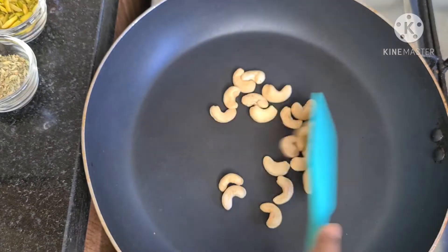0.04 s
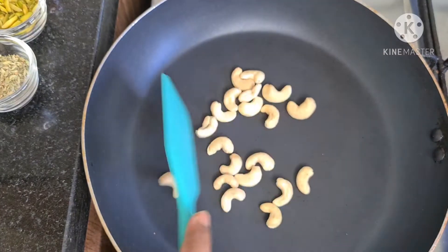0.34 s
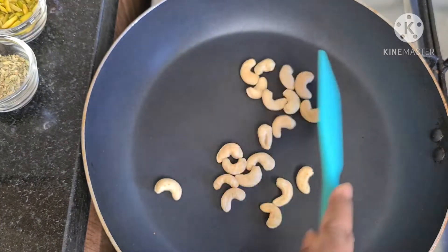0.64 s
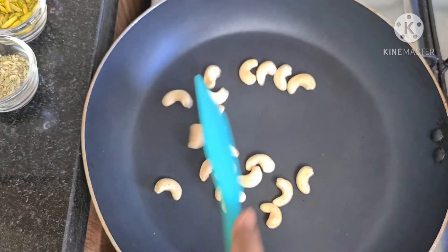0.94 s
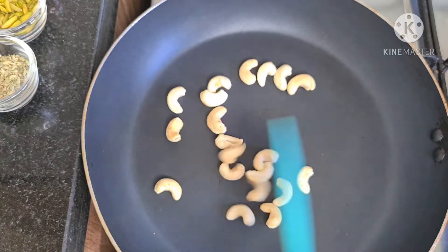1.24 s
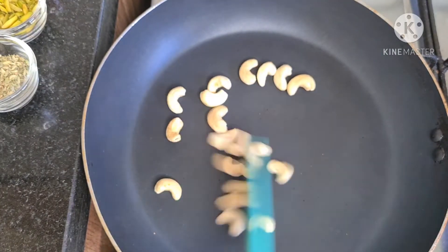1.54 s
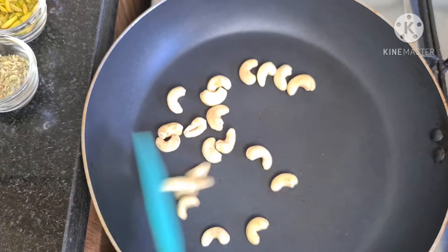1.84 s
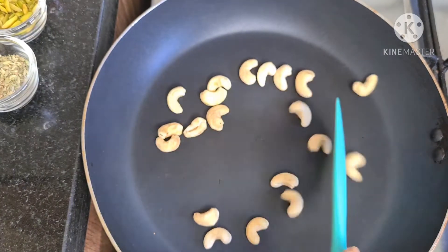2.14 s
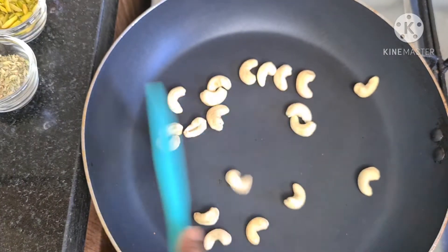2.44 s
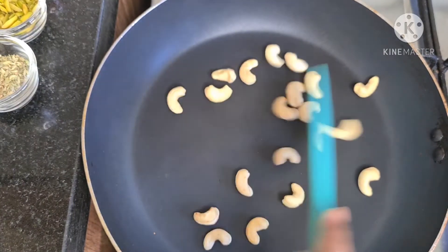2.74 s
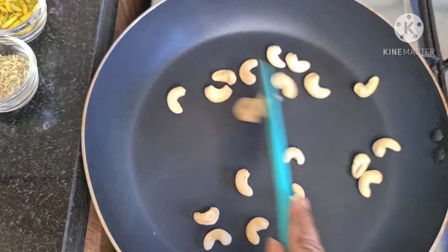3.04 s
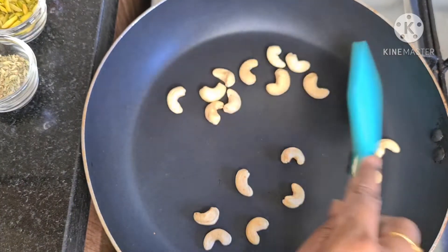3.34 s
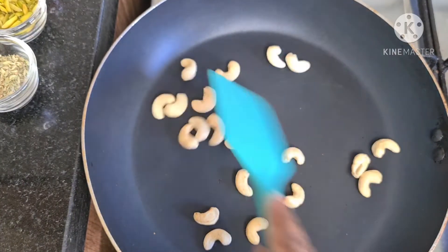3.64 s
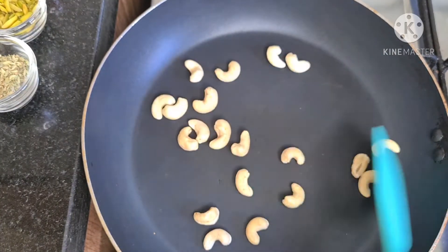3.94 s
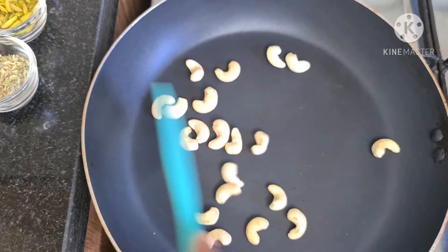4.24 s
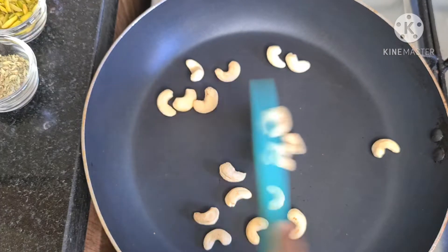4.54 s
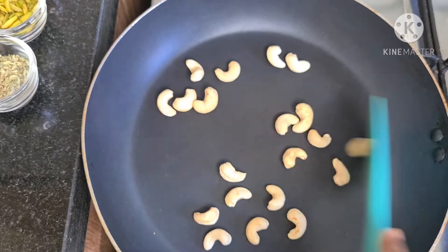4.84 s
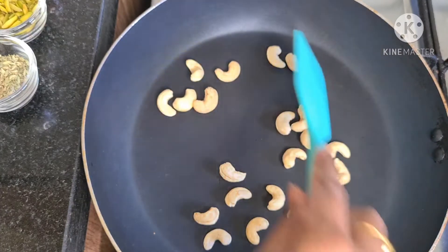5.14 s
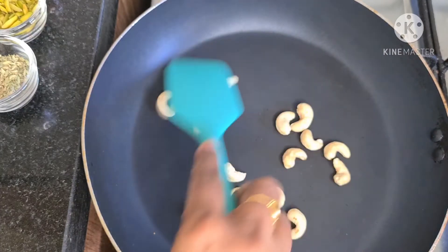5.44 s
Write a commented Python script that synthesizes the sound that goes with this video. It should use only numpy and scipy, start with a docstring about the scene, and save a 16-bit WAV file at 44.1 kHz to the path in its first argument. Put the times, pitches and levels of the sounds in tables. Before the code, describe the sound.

Cashews are stirred around a dry frying pan with a silicone spatula. Short, uneven strokes drag them across the coating in rattling scrapes, and single nuts knock against the pan with a dull, brief ring. Thin metal bangles clink high above now and then. The stirring eases briefly near the end, then resumes. The microphone is close, in a small kitchen with a faint rumble and hiss.

```python
"""Cashews rattle and scrape around a dry frying pan, stirred with a silicone spatula close to a phone.
Each stroke drags the nuts over the coating in a stream of tiny bumps, and single knocks ring the same
damped pan. Thin metal, probably bangles on the stirring wrist, clinks high above them.
The walls of a small kitchen add a short tail; a low rumble, a weak hum and a faint hiss lie underneath."""
import sys
import numpy as np
from scipy import signal
from scipy.fft import rfft, irfft
from scipy.io import wavfile

SR = 44100
rng = np.random.default_rng(int(sys.argv[2]) if len(sys.argv) > 2 else 0)


def master(y):
    """Save y as 16-bit WAV."""
    cut = np.clip(np.atleast_2d(y).T, -1, 1)
    pcm = np.round(cut * 32767)  # scale
    wavfile.write(sys.argv[1], SR, pcm.astype(np.int16))


N = 251281
RING_SIZE, STROKE_SIZE, ONSET_SIZE = 10000, 30000, 900  # samples
TIME = np.arange(N) / SR
AGE = TIME[:RING_SIZE]  # seconds since a hit

# resonances of the pan: (frequency [Hz], level [dB], t60 [s])
PAN_MODES = [(653.3, -34, 0.42), (665.4, -9.5, 0.13), (804, 3.5, 0.15), (823.3, -1.5, 0.057),
             (807.8, 7.5, 0.15), (835, 7.5, 0.018), (981, -1, 0.12), (1030, -8.5, 0.05),
             (1209, -14.5, 0.045), (1297.6, -5, 0.088), (1407, -17, 0.24), (1525, -3, 0.036),
             (1857, -1.5, 0.024), (1940, -21, 0.096), (2008, -13.5, 0.12), (2090, -31, 0.1),
             (2360, -29.5, 0.24), (2646, -24.5, 0.39), (2800, -12.5, 0.086), (2857, -26.5, 0.17),
             (3185, -16.5, 0.073), (3335, -21, 0.087), (3580, -22.5, 0.13), (3570, -35.5, 0.12),
             (4097, -29.5, 0.15), (4080, -27, 0.14), (4580, -23.5, 0.1)]


def amp(db):
    """Decibels to gain."""
    return 10 ** (np.asarray(db) / 20)


def fade(t60):
    """Exponential decay over the length of one ring."""
    return np.exp(-np.log(1000) * AGE / t60)


def unit(x, size=N):
    """Scale to rms 1 over the first `size` samples."""
    return x / np.sqrt(np.mean(x[..., :size] ** 2))


def band(x, low_hz, high_hz):
    """Causal band-pass."""
    return signal.sosfilt(signal.butter(2, [low_hz, high_hz], "band", fs=SR, output="sos"), x)


def noise(colour, size, alike_hz):
    """Stereo noise coloured by (frequency [Hz], level [dB]) points, narrowing to mono below alike_hz."""
    hz, db = np.transpose(colour)
    bin_hz = np.fft.rfftfreq(size, 1 / SR) + 1
    mid, side = rfft(rng.standard_normal((2, size)))
    side = side * bin_hz / np.hypot(bin_hz, alike_hz)
    gain = amp(np.interp(np.log(bin_hz), np.log(hz), db))
    return unit(irfft(np.array([mid + side, mid - side]) * gain, size))


def add(out, time_s, sound):
    """Mix a sound in at time_s."""
    i = max(int(time_s * SR), 0)
    out[:, i:i + sound.shape[1]] += sound[:, :max(N - i, 0)]


def ringing(modes, rise_cycles):
    """One decaying complex tone for each mode; the contact time rounds its start."""
    hz, db, t60 = np.transpose(modes)
    poles = np.exp((2j * np.pi * hz - np.log(1000) / t60) / SR)
    tones = np.cumprod(np.repeat(poles[:, None], RING_SIZE, axis=1), axis=1)
    rise = np.minimum(np.outer(hz, AGE) / rise_cycles, 1)
    return amp(db)[:, None] * rise * tones


def mode_shares(hz, wide_hz, spread_db=3.5):
    """The struck spot sets each mode's share; higher modes reach the two microphones out of step."""
    share, turn = rng.standard_normal((2, len(hz)))
    phase = np.minimum((hz / wide_hz) ** 2, 1) * turn
    return amp(spread_db * share) * np.exp(1j * np.array([phase, -phase]))


def pan_contact(tones):
    """A nut touches one spot of the pan: ringing modes plus a dry crack, in five equally loud registers."""
    # the registers belly, wall, clack, bite and tick: (low edge [Hz], high edge [Hz])
    registers = [(600, 720), (720, 1000), (1000, 1650), (1650, 2600), (2600, 11000)]
    # dry crack of nut on metal: (frequency [Hz], level [dB])
    crack_colour = [(450, -41), (640, 6), (880, 5), (1150, 6.5), (1500, 15), (2000, -29.5), (2500, -7.5),
                    (3300, -5), (5000, -12.5), (7500, -20), (11000, -25), (16000, -52)]
    hz = np.array(PAN_MODES)[:, 0]
    share = mode_shares(hz, wide_hz=1417)
    damping = 1 + 0.52 * fade(0.42)  # the ring falls faster at first, while the nut presses on the metal
    crack = amp(-7) * noise(crack_colour, RING_SIZE, alike_hz=1810) * (fade(0.056) + 2.04 * fade(0.11))
    parts = []
    for low, high in registers:
        inside = (hz >= low) & (hz < high)
        ring = damping * ((share * inside) @ tones).imag
        parts.append(unit(ring + band(crack, low, high), ONSET_SIZE))
    return np.array(parts)


def register_gains(level_db, belly_db, clack_db, tick_db, trim_db):
    """The spot splits the ring between belly and wall; a hard touch adds clack, bite and tick."""
    wall = level_db - 10 * np.log10(1 + amp(belly_db) ** 2)
    levels_db = np.array([wall + belly_db, wall, level_db + clack_db, level_db + tick_db])
    belly, wall, clack, tick = levels_db + trim_db
    bite = clack + 0.47 * (tick - clack) + 1
    return amp([belly, wall, clack, bite, tick])


def spatula_push(length_s, crescendo_db, attack_s=0.0082, settle_db_per_s=410, rock_db_per_s=78):
    """The blade gathers or sheds nuts until its release; then most stop quickly and a few rock on."""
    t = TIME[:STROKE_SIZE]
    attack = np.minimum(t / attack_s, 1)
    to_go = np.clip(1 - t / max(length_s, attack_s), 0, 1)
    after_s = np.maximum(t - length_s, 0)
    settling = amp(-settle_db_per_s * after_s)
    rocking = amp(-12.5 - rock_db_per_s * after_s)
    return attack * amp(-crescendo_db * to_go) * np.hypot(settling, rocking)


def sliding_nuts(spots, nuts=4, bumps_per_s=400, spread_db=4):
    """Nuts catch and slip on the coating, each a stream of tiny uneven bumps at its own spot."""
    # spatula strokes: (start [s], release [s], level at release [dB], crescendo [dB],
    # belly over wall [dB], clatter over level [dB], rasp over level [dB])
    strokes = [(0, 0.01, -43, -21.5, 0, 0, -10.5), (0.091, 0.311, -40.5, 6.5, -5, -5.5, -18.5),
               (0.401, 0.45, -38.5, -0.5, 1.5, -7.5, -26.5), (0.538, 0.628, -53, 15, 3, 12.5, -1.5),
               (0.769, 0.928, -37, 8.5, -14, -6, -17), (1.164, 1.217, -43, -3, -8.5, -18, -31),
               (1.253, 1.324, -37.5, -1, -5.5, -1.5, -17.5), (1.484, 1.665, -42.5, 3.5, -4.5, -7.5, -20),
               (1.723, 1.821, -40.5, -6, -7.5, -4, -22), (1.904, 1.996, -35.5, 6.5, -16, -4, -16.5),
               (2.141, 2.213, -41, -4.5, 1.5, -6, -15.5), (2.274, 2.414, -55, 1, -4, -15, -26),
               (2.516, 2.708, -33, 20.5, -4, -1.5, -17.5), (2.74, 2.845, -41.5, 0.5, 2, -4, -19),
               (2.985, 3.11, -36, 17, -5, -10.5, -25), (3.386, 3.633, -36, 14.5, -9.5, -5, -20.5),
               (4.03, 4.152, -43, 8.5, -6, -7, -20.5), (4.273, 4.32, -46.5, 0, -2, -17, -23),
               (4.42, 4.672, -51.5, -12, -4.5, -7, -18), (4.872, 5.008, -56.5, 4, 13, -9, -13.5),
               (5.25, 5.387, -52.5, 14, 0, 6, -4.5), (5.403, 5.556, -48, -0.5, -24, -5, -14.5),
               (5.572, 5.687, -35, 8.5, -8, -15, -23.5)]
    out = np.zeros((2, N))
    for start, release, level, crescendo, *colour in strokes:
        push = spatula_push(release - start, crescendo)
        rattle = 0
        for k in rng.permutation(len(spots))[:nuts]:
            strength = amp(spread_db * np.minimum(rng.exponential(size=STROKE_SIZE), 4))
            direction = rng.choice([-1, 1], STROKE_SIZE)
            catches = rng.random(STROKE_SIZE) < bumps_per_s / nuts / SR
            bumps = np.float32(push * strength * direction * catches)
            rattle = rattle + signal.fftconvolve(bumps[None, None], np.float32(spots[k]), axes=-1)
        gains = register_gains(level, *colour, trim_db=[-1, 0.67, -4.15, -1.2])
        effort = np.sqrt(np.mean(push ** 2))
        add(out, start, effort * sum(gain * unit(part) for gain, part in zip(gains, rattle)))
    return out


def knocks(spots, lead_s=0.0009):
    """Single blows on the pan: soft ones near the centre ring the belly, hard ones clack and tick."""
    # knocks of nuts and spatula:
    # (time [s], level [dB], belly over wall [dB], clack over level [dB], tick over level [dB])
    blows = [(0.124, -40.5, 2, -4.5, -22), (0.155, -32, -25, -18, -38), (0.206, -40, -23, -28, -36),
             (0.259, -26.5, -15, -5.5, -22.5), (0.295, -28, -19, -9.5, -38), (0.343, -43, -17, 9.5, -9.5),
             (0.379, -38.5, -17, -20, -26), (0.434, -34, -14, -11, -27), (0.497, -38.5, 22, -21, -32),
             (0.541, -25, 6.5, -1.5, -24.5), (0.555, -36, 8, -13, -32), (0.603, -40, 23, 3.5, -10),
             (0.69, -48.5, 3, 4.5, -10.5), (0.738, -46, 20, -29, -38), (0.779, -41, 27, -15, -30),
             (0.864, -35.5, -24, -26, -28), (0.89, -38, -10, -3.5, -14), (0.921, -32, -10, -11, -14),
             (0.949, -31.5, -19, -22, -22), (1.061, -38.5, -23, -2.5, -17), (1.169, -38, -17, -16.5, -31),
             (1.265, -29, -15, -6, -21), (1.288, -38, -20, 4, -11), (1.3, -31, -10, -6, -20),
             (1.526, -36, -12, -8, -24.5), (1.559, -28, -22, -22, -34), (1.626, -33.5, -15, -14, -20),
             (1.645, -30.5, -10, -22, -46), (1.714, -34.5, -13, -9, -30), (1.757, -37, -1, -14, -17),
             (1.947, -34, -18, -6.5, -24), (1.959, -31, -23, -5, -18), (2.01, -38.5, 7, -20, -25),
             (2.152, -37, -1, -11, -8), (2.182, -32, 10, -7.5, -16.5), (2.359, -43.5, -8, -21, -39),
             (2.537, -42, -29, -10, -33), (2.606, -32.5, -35, -28, -40), (2.674, -34.5, -25, 1, -15.5),
             (2.693, -33.5, 26, -19, -18.5), (2.796, -36, 5, 2, -11.5), (2.825, -54, 15, -12, -13),
             (2.981, -42.5, 6, -16, -31), (3.091, -33.5, -12, -9, -36), (3.105, -30, -13, -10, -28),
             (3.138, -30.5, -9, -5, -20.5), (3.403, -43, 26, -16, -13), (3.445, -30, 29, -16.5, -36),
             (3.516, -36, -14, -15, -23), (3.549, -33, -3, -23, -33), (3.609, -30, -5, -11, -15),
             (3.633, -29.5, -5.5, -12, -26), (4.086, -32.5, 2, -12.5, -27.5),
             (4.141, -36.5, -25, -5.5, -7.5), (4.181, -35.5, -25, -11, -25), (4.244, -37, -15, -15.5, -32),
             (4.287, -33.5, -20, -4, -13), (4.373, -37, -20, -2.5, -25.5), (4.456, -35.5, -4, -29, -20),
             (4.529, -30.5, -33, -10.5, -34), (4.588, -35.5, 4, -2, -17), (4.628, -36.5, 10, -3, -24),
             (4.667, -35, 26, -5, -26), (4.735, -48.5, 6, -3.5, -20), (5.113, -52.5, 31, -6, -28),
             (5.464, -38, -16, -1.5, -20.5), (5.614, -37, -22, -15, -38), (5.676, -38, 6, -16, -14.5)]
    out = np.zeros((2, N))
    for k, (time_s, *blow) in enumerate(blows):
        gains = register_gains(*blow, trim_db=[-2.14, -1.5, -1, -1])
        add(out, time_s - lead_s, np.tensordot(gains, spots[k % len(spots)], 1))
    return out


def bangles(fine_count=90, fine_t60=0.056, attack_s=0.0008):
    """Thin metal rings clink: a few clear tones over a splash of finer modes and a shivering chink."""
    # bangle clinks: (time [s], ring level [dB], splash level [dB])
    clinks = [(0.186, -68, -47), (0.243, -52.5, -47), (0.637, -53.5, -57.5), (0.883, -74, -46.5),
              (0.95, -53.5, -48.5), (1.063, -60, -57), (1.573, -60, -57.5), (1.733, -67, -68),
              (2.348, -88, -67.5), (2.436, -62, -60), (3.029, -74, -49.5), (3.044, -79, -46.5),
              (3.108, -55, -48), (3.203, -84, -60.5), (3.56, -49, -55), (3.719, -67, -56.5),
              (4.155, -59.5, -57), (4.442, -63, -54.5), (4.538, -76, -50.5), (4.594, -49.5, -44.5),
              (4.897, -80, -48.5), (4.92, -80, -49.5), (4.958, -42.5, -40.5), (5.04, -66, -60)]
    # clear resonances of the bangles: (frequency [Hz], level [dB], t60 [s])
    bangle_modes = [(5000, -3.5, 0.089), (8730, -4.5, 0.23), (8836, 15, 0.077), (9940, -35, .1),
                    (12600, 0, 0.11), (14600, -13, .08), (15370, -14, 0.088)]
    # colour of the metal's dense high modes: (frequency [Hz], level [dB])
    splash_colour = [(2500, -13), (4800, -11), (6300, -13.5), (7100, -6.5), (8000, -13), (9000, 0.5),
                     (9700, 2), (11000, -7), (12200, 1.5), (13200, -4.5), (14500, 5), (16000, -16.5)]
    fine_hz = np.linspace(4000, 15500, fine_count) + rng.uniform(-90, 90, fine_count)
    fine_modes = [(hz, np.interp(hz, *np.transpose(splash_colour)), fine_t60) for hz in fine_hz]
    fine_tones = ringing(fine_modes, rise_cycles=36)
    clear_tones = ringing(bangle_modes, rise_cycles=10)
    chink_shape = np.minimum(AGE / attack_s, 1) * (fade(0.013) + amp(-14) * fade(0.2))
    balance = amp([[0.5], [-0.5]])  # the wrist is slightly to the left
    out = np.zeros((2, N))
    for time_s, ring_db, splash_db in clinks:
        ring = (mode_shares(np.array(bangle_modes)[:, 0], wide_hz=11400) @ clear_tones).imag
        fine_shares = mode_shares(fine_hz, wide_hz=9600) * rng.standard_normal(fine_count)
        shimmer = (fine_shares @ fine_tones).imag
        chink = noise(splash_colour, RING_SIZE, alike_hz=4000) * chink_shape
        splash = unit(shimmer, ONSET_SIZE) + amp(-3) * unit(chink, ONSET_SIZE)
        clink = amp(ring_db + 5) * unit(ring, ONSET_SIZE) + amp(splash_db + 2) * unit(splash, ONSET_SIZE)
        add(out, time_s - attack_s, clink * balance)
    return out


def kitchen_walls(x, wet_db, t60, gap_s=0.0082):
    """Hard walls add a short diffuse tail to the direct sound."""
    tail = noise([(20, 0), (20000, 0)], RING_SIZE, alike_hz=1000)
    tail = tail * fade(t60) * np.clip(AGE / gap_s - 1, 0, 1)
    tail = tail / np.sqrt(np.sum(tail ** 2) / 2)
    return x + amp(wet_db) * signal.oaconvolve(x, tail, axes=-1)[:, :N]


def room_tone(rumble_db=-60, hum_hz=74.5, hum_db=-73, hiss_db=-67):
    """A low rumble and a weak hum sit in the centre, under a faint wide hiss."""
    # low room rumble: (frequency [Hz], level [dB])
    rumble_colour = [(15, -26), (28, -21.5), (43, 4.5), (58, 0), (76, 0.5), (105, -1), (132, -6),
                     (172, -20.5), (235, -8), (290, -10.5), (360, -12.5), (500, -13), (700, -71),
                     (1200, -40.5)]
    # brief swells of the rumble's deepest part: (time [s], gain [dB], half width [s])
    swells = [(.89, 10.5, 0.057), (1.97, 9.5, 0.19), (4.88, 10, 0.062)]
    # kitchen hiss: (frequency [Hz], level [dB])
    hiss_colour = [(500, -33), (660, 11), (820, 6.5), (1100, -11.5), (1700, 1), (2400, -13.5), (4000, -14),
                   (6500, -18), (8000, -44), (13000, -44), (15000, -15.5), (16000, -15)]
    rumble = noise(rumble_colour, N, alike_hz=900)
    deep = signal.sosfiltfilt(signal.butter(2, 110, fs=SR, output="sos"), rumble)
    swell_db = sum(db * np.exp(-((TIME - time_s) / width) ** 2) for time_s, db, width in swells)
    rumble = rumble + (amp(swell_db) - 1) * deep
    hum = np.sqrt(2) * np.sin(2 * np.pi * hum_hz * TIME)
    hiss = unit(band(noise(hiss_colour, N, alike_hz=900), 600, 16000))
    return amp(rumble_db) * rumble + amp(hum_db) * hum + amp(hiss_db) * hiss


def scene(spot_count=24):
    """The stirred pan and the bangles sound in the kitchen, over its room tone."""
    tones = ringing(PAN_MODES, rise_cycles=1)
    spots = [pan_contact(tones) for _ in range(spot_count)]
    # the pan radiates almost nothing below its lowest mode
    low_cut = signal.ellip(5, 0.5, 50, 610, "high", fs=SR, output="sos")
    pan = signal.sosfilt(low_cut, knocks(spots) + sliding_nuts(spots))
    pan = kitchen_walls(pan, wet_db=-11.5, t60=0.22)
    wrist = kitchen_walls(bangles(), wet_db=-14, t60=0.35)
    return pan + wrist + room_tone()


def record(dry):
    """The phone cuts the treble steeply above 15.7 kHz."""
    return signal.sosfilt(signal.ellip(8, 0.2, 70, 15700, fs=SR, output="sos"), dry)


dry = scene()
out = record(dry)
master(out)
```